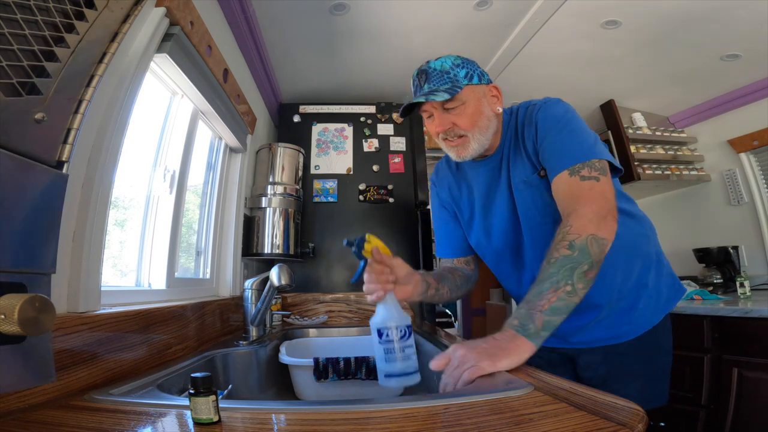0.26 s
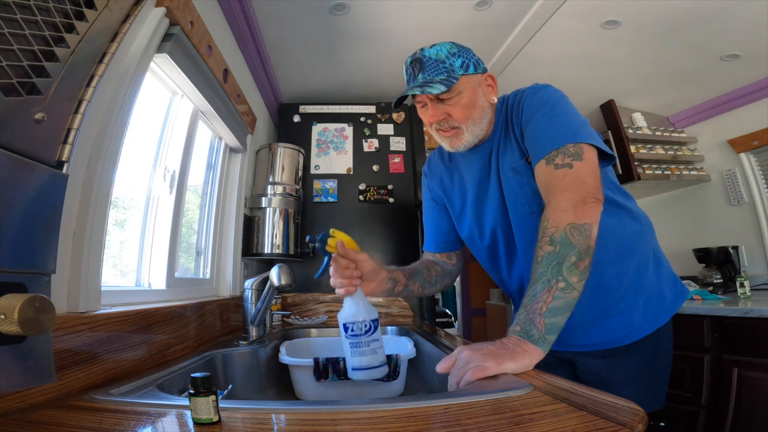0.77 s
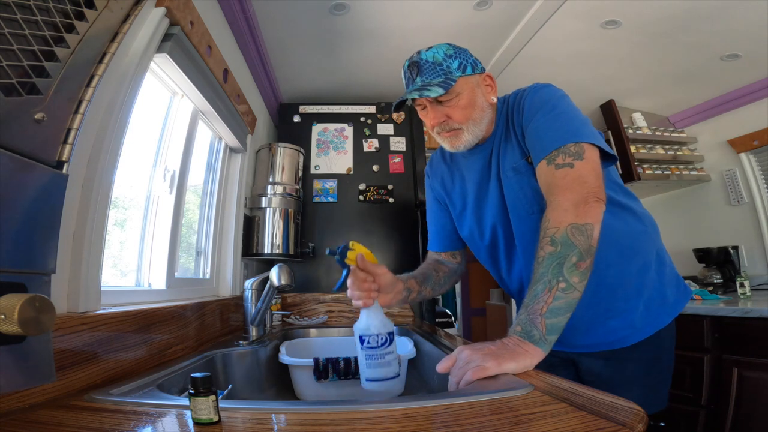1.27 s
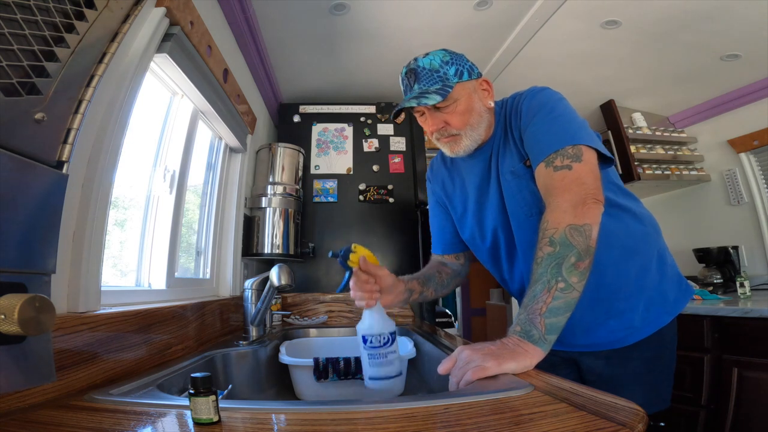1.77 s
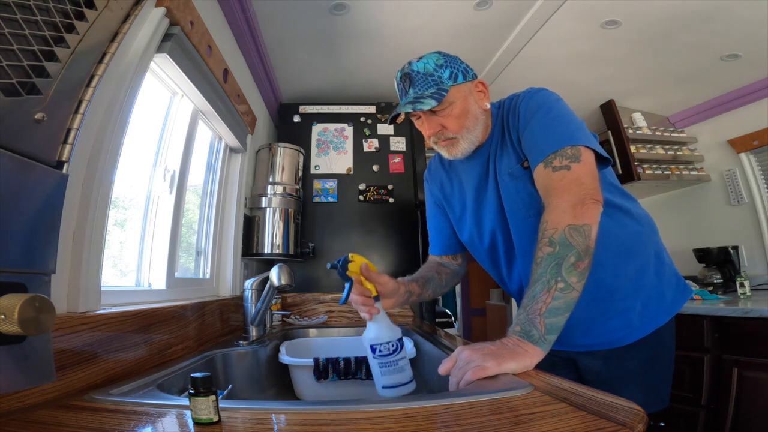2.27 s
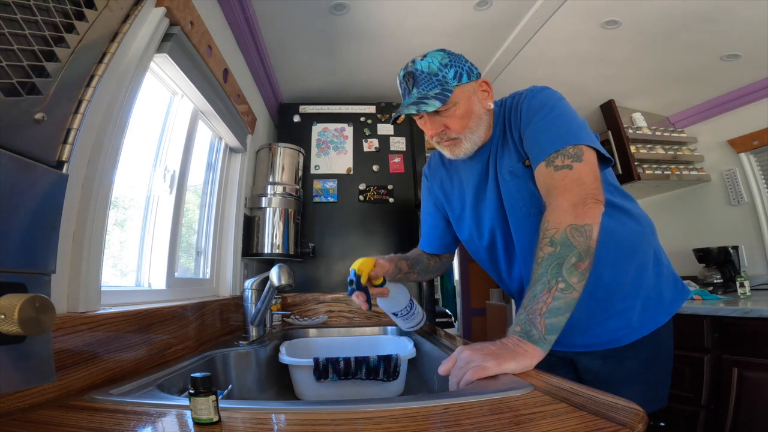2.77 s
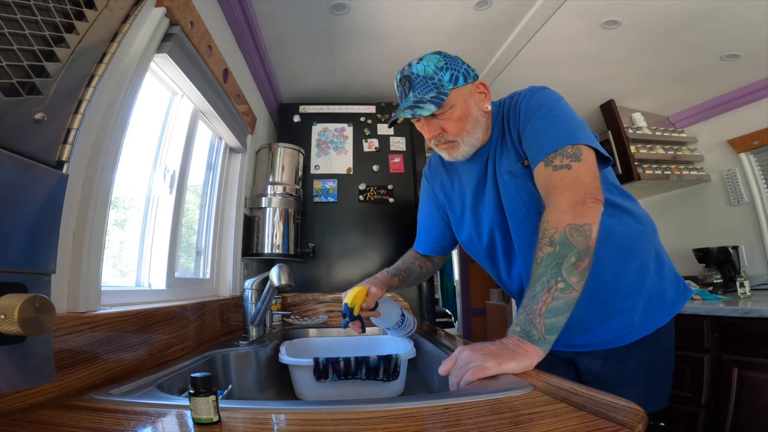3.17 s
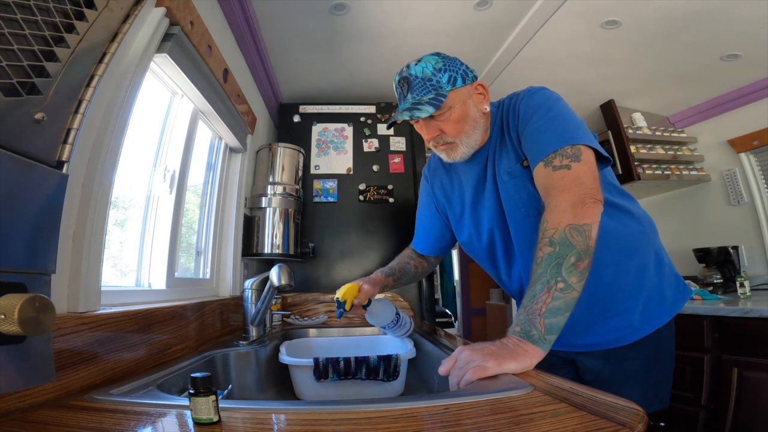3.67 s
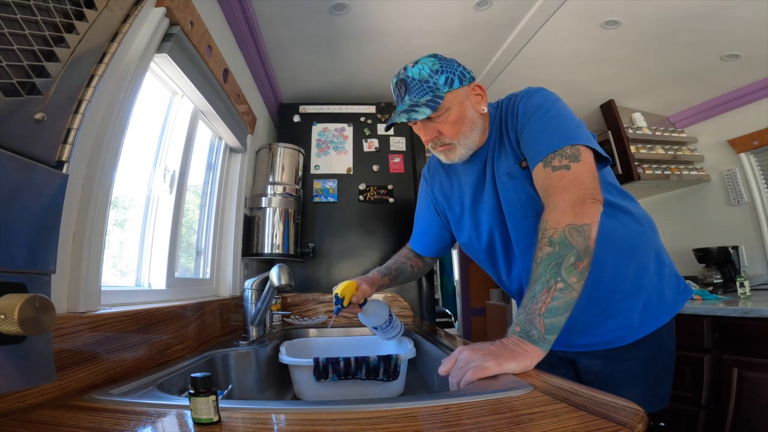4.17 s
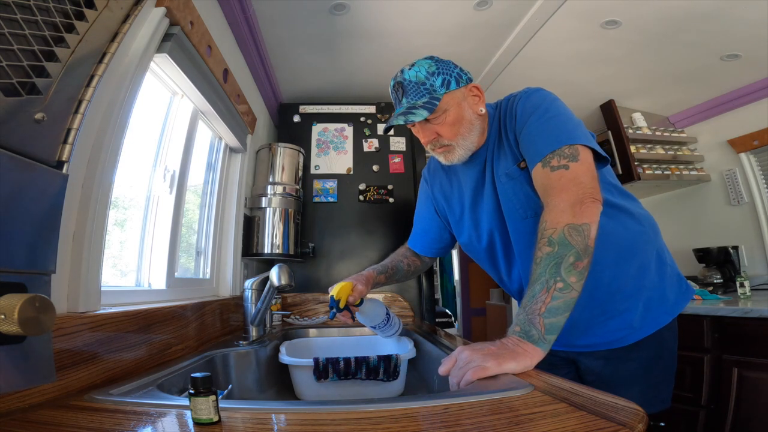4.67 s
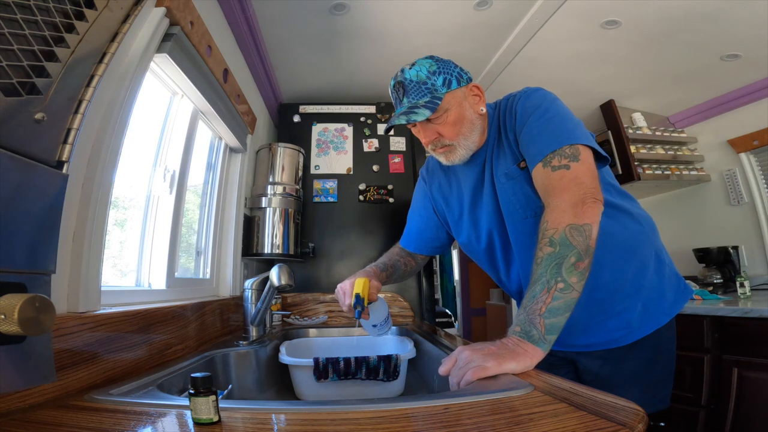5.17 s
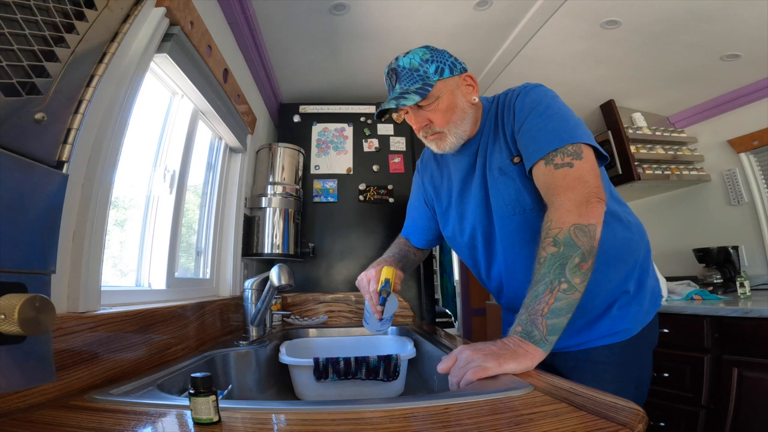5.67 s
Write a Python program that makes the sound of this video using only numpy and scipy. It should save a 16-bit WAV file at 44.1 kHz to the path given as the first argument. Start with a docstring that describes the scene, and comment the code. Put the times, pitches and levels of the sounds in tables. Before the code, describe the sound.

Liquid sloshes and froths in a shaken plastic bottle, then a creaky spray trigger snaps and hisses over a hollow steel basin in a small kitchen.

```python
"""A spray bottle scrapes off a counter and is shaken, its liquid slapping, gulping and frothing; then the trigger
clicks and groans, the nozzle spits and hisses, and a steel sink booms. Room air and a thin whine lie beneath.
Liquid and mist are coloured noise, with ringing bubbles in the liquid; the clicks and basin are decaying sines
with noise bursts; the groans are gliding harmonics. A small hard room answers with a short stereo tail."""
import sys
import numpy as np
from scipy import signal
from scipy.fft import rfft, irfft, next_fast_len
from scipy.io import wavfile
from scipy.ndimage import uniform_filter1d, map_coordinates

SR = 44100
rng = np.random.default_rng(int(sys.argv[2]) if len(sys.argv) > 2 else 0)


def transcribe(u):
    """Save the signal u as a 16-bit wav file named by the first command-line argument.

    u: samples, shape (n,) or (channels, n), limited to [-1, 1]; the rate is SR.
    q: integer samples, one column per channel.
    """
    v = np.clip(np.atleast_2d(u).T, -1, 1)
    q = np.round(v * 32767).astype(np.int16)
    wavfile.write(sys.argv[1], SR, q)


N = 261072
T = np.arange(N) / SR  # the time line in seconds

# low rumble of a moving mass against the counter: f/Hz, level/dB per Hz
RUMBLE_SPECTRUM = [(12, -25), (20, 4.5), (60, -7.5), (87, -3), (114, -14), (198, -11.5), (366, -46),
                   (400, -28.5), (520, -64), (880, -120)]


def amp(db):
    """Decibels to gain."""
    return np.exp(np.asarray(db) * (np.log(10) / 20))


def unit(x):
    """Scale to rms 1."""
    return x / np.sqrt(np.mean(x ** 2) + 1e-20)


def along(points, hz):
    """Interpolate (f/Hz, value) points on a log frequency axis."""
    f, value = np.transpose(points)
    return np.interp(np.log(hz + 1), np.log(f + 1), value)


def level(times, db):
    """Gain per sample from a dB curve, silent outside it."""
    return uniform_filter1d(amp(np.interp(T, times, db, left=-120, right=-120)), size=200)


def held(s, length, rise, fall):
    """An envelope from s: straight attack, hold, exponential release."""
    attack = np.clip((T - s) / rise, 0, 1)
    return attack * np.exp(-np.clip((T - s - length) / fall, 0, 20))


def add(track, s, db, rise, fall):
    """Add a swell that peaks at s, exponential on both sides."""
    near = slice(max(int((s - 9 * rise) * SR), 0), int((s + 9 * fall) * SR))
    t = T[near] - s
    track[near] += amp(db) * np.exp(-np.maximum(-t / rise, t / fall))


def wobble(rate):
    """A smooth random curve, rate knots a second."""
    return map_coordinates(rng.standard_normal(int(N * rate / SR) + 4), [T * rate])


def noise():
    """White noise."""
    return rng.standard_normal(N)


def filtered(x, response):
    """Shape the spectrum of x with a response of frequency."""
    m = next_fast_len(N + SR // 2)
    return irfft(rfft(x, m) * response(np.fft.rfftfreq(m, 1 / SR)), m)[..., :N]


def coloured(x, spectrum, lo_hz=10, hi_hz=20000):
    """One band of x under a spectrum, at rms 1."""
    def response(hz):
        band = 1 / np.sqrt((1 + (lo_hz / (hz + 1)) ** 8) * (1 + (hz / hi_hz) ** 8))
        return amp(along(spectrum, hz)) * band
    return unit(filtered(x, response))


def resonances(x, modes):
    """Ring x through (f/Hz, width/Hz, level/dB) modes of alternating sign, at rms 1."""
    def response(f):
        return sum((-1) ** k * amp(db) * 1j * f * width / (centre * centre - f * f + 1j * f * width)
                   for k, (centre, width, db) in enumerate(modes))
    return unit(filtered(x, response))


def droplets(rate, hiss):
    """Tiny impacts of random size, rate a second, over a smooth hiss."""
    impacts = unit(noise() * (rng.random(N) < rate / SR))
    return unit(impacts + hiss * noise())


def bubbles(rate, centre_hz, spread, cycles, glide):
    """A cloud of ringing bubbles, rate a second, each rising in pitch as it dies."""
    count = int(rate * N / SR)
    pitch, size = rng.standard_normal((count, 2)).T[:, :, None]
    hz = np.clip(centre_hz * np.exp(spread * pitch), 150, 9000)
    t = np.arange(int(3 * SR * cycles / centre_hz)) / SR
    age = hz * t / cycles
    tone = np.sin(2 * np.pi * hz * t * (1 + glide * age))
    ring = amp(6.8 * np.minimum(size, 2)) * tone * np.exp(-age) * (1 - t / t[-1])
    at = rng.integers(0, N, (count, 1)) + np.arange(len(t))
    return unit(np.bincount(at.ravel(), ring.ravel(), N)[:N])


def background(floor_db=-64.5, whine_hz=10230, whine_db=-84, side_db=-9):
    """Quiet room air as coloured stereo noise, with a thin electric whine of slightly wandering pitch."""
    # room air: f/Hz, level/dB per Hz
    air_spectrum = [(12, -31), (20, -8), (50, -18.5), (103, -27), (213, -11.5), (273, -27), (306, -23.5),
                    (685, -33), (2030, -30), (4800, -33), (9100, -49), (10500, -37), (11400, -52),
                    (15400, -56)]
    mid = coloured(noise(), air_spectrum)
    side = amp(side_db) * coloured(noise(), air_spectrum)
    whine = amp(whine_db) * np.sin(2 * np.pi * np.cumsum(whine_hz + 20 * wobble(60)) / SR)
    return amp(floor_db) * np.array([mid + side, mid - side]) + whine


def kitchen(x):
    """Hard walls and cupboards: a short decaying noise tail, more alike at the two ears in the bass."""
    # reverberation time: f/Hz, t60/s
    tail_t60 = [(100, 0.54), (800, 0.21), (2500, 0.21), (6000, 0.18), (14000, 0.2)]
    # stereo width of the reflections: f/Hz, side minus mid level/dB
    tail_width = [(60, -15), (250, -13), (1000, -3), (4000, -3), (9000, -3), (13000, 1)]
    hz, t, z = signal.stft(rng.standard_normal((2, SR // 2)), SR, nperseg=256)
    z = z * amp(-60 * t / along(tail_t60, hz)[:, None])
    gains = np.array([np.ones_like(hz), amp(along(tail_width, hz))])
    mid, side = signal.istft(z * gains[:, :, None], SR, nperseg=256)[1]
    tail = np.array([mid + side, mid - side]) / np.linalg.norm(mid)
    delayed = np.pad(x, (90, 0))  # samples of pre-delay
    return signal.fftconvolve(delayed[None], tail, axes=1)[:, :N]


def handling(rub_db=0, rumble_db=-3, swish_db=0, palm_db=-1):
    """Plastic rubs, swishes and rumbles on the counter as coloured noise; later it turns in the palm."""
    # sliding off the counter: t/s, relative rub level/dB, rumble level/dB, swish level/dB
    slide_curve = [(0.0, -54, -39, -62), (0.026, -53.5, -49, -69), (0.124, -45, -42, -57.5),
                   (0.216, -51, -34, -56.5), (0.293, -39.5, -35, -48.5), (0.342, -54, -45, -57),
                   (0.396, -50, -58, -46), (0.434, -58, -27, -75), (0.49, -85, -33, -68)]
    # turning in the hand at the end: t/s, relative level/dB
    turn_curve = [(5.501, -52), (5.59, -52), (5.62, -64), (5.7, -59.5), (5.72, -54), (5.77, -56.5),
                  (5.84, -71.5), (5.92, -57.5)]
    # plastic on the counter, then skin on plastic: f/Hz, level/dB per Hz
    rub_spectrum = [(150, -28), (250, -0.5), (371, -25), (522, -3.5), (609, -9.5), (1170, -4.5),
                    (5100, -9.5), (11600, -19.5), (15000, -32)]
    palm_spectrum = [(120, -20), (230, -1), (400, -11), (800, -13), (1300, 0.5), (2000, -4), (3000, -3.5),
                     (6000, -7.5), (12000, -24), (15000, -29)]
    s, *columns = np.transpose(slide_curve)
    rub, rumble, swish = (level(s, db) for db in columns)
    turn = level(*np.transpose(turn_curve))
    return (amp(rub_db) * rub * coloured(droplets(2500, hiss=0.81), rub_spectrum, hi_hz=4800)
            + amp(swish_db) * swish * coloured(noise(), rub_spectrum, lo_hz=4630)
            + amp(rumble_db) * rumble * coloured(noise(), RUMBLE_SPECTRUM)
            + amp(palm_db) * turn * coloured(droplets(1500, hiss=0.94), palm_spectrum))


def sink(boom_db=-4, thud_fall=0.022, splash_fall=0.011, shudder_db=-14, shudder_fall=0.11):
    """Each blow rings the thin steel basin's modes, with a dull thud, a short splash and a cabinet shudder."""
    # blows: t/s, relative ring level/dB, relative thud level/dB, share of the full ring time
    blows = [(0.0, -34.5, -70, 0.53), (0.387, -37.5, -38.5, 0.79), (0.423, -38.5, -58, 0.85),
             (3.251, -22.5, -39, 0.6), (3.298, -18.5, -35, 0.47), (3.329, -20, -41, 0.66),
             (3.37, -27, -50, 0.84), (3.415, -35, -58, 0.45), (3.472, -51, -47, 0.64),
             (3.657, -17.5, -26.5, 1), (3.882, -18, -30.5, 1), (4.785, -44, -37.5, .5),
             (5.55, -69, -77, .6), (5.676, -56, -63, .6)]
    # modes of the steel basin: f/Hz, level/dB, full t60/s
    basin_modes = [(37.7, -1, 0.46), (68.6, -20, 0.4), (87.4, 5.5, 0.31), (141, -15.5, .42),
                   (209.5, -10, 0.25), (242, -19.5, 0.52), (292, -12, 0.19), (534, -14.5, 0.14),
                   (720, -21, 0.11), (900, -16, 0.1)]
    # the cabinet under the sink: f/Hz, level/dB per Hz
    cabinet_spectrum = [(20, -15), (40, 4), (60, 5), (85, 3.5), (115, -12.5), (240, -14.5), (330, -40),
                        (600, -84)]
    thud_spectrum = [(25, -17), (70, 15.5), (150, 10.5), (210, 13.5), (290, 8.5), (400, -27), (900, -63)]
    splash_spectrum = [(200, -29), (450, 0.0), (720, 4.5), (1100, 1.0), (3000, -4), (8000, -19), (14000, -39)]
    detune, build_cycles = 0.023, 0.76  # modes shift from blow to blow and take part of a cycle to build up
    hard_blow_db, splash_db = -15.5, -3  # at this ring level the splash sits this far from its thud; softer, lower
    out, thud, splash, shudder = np.zeros((4, N))
    t = np.arange(SR // 2) / SR
    for s, db, thud_db, share in blows:
        ring = 0
        for hz, mode_db, t60 in basin_modes:
            louder, shift = rng.standard_normal(2)
            decay = amp(mode_db + louder - 60 * t / (share * t60))
            build = 1 - np.exp(-t * hz / build_cycles)
            ring = ring + decay * build * np.sin(2 * np.pi * hz * (1 + detune * shift) * t)
        after = out[max(round(s * SR), 0):][:len(t)]
        after += amp(db + boom_db) * ring[:len(after)]
        shudder += amp(db + shudder_db) * held(s, 0.013, 0.035, share * shudder_fall)
        add(thud, s + 0.0051, thud_db, .002, thud_fall)
        add(splash, s + 0.0016, thud_db + splash_db + db - hard_blow_db, .003, splash_fall)
    return (out + shudder * coloured(noise(), cabinet_spectrum)
            + thud * coloured(noise(), thud_spectrum) + splash * coloured(noise(), splash_spectrum))


def piston(jitter=0.014, unsteady=0.015, count=6):
    """The seal sticks and slips: harmonics of a bending, unsteady pitch sweep through fixed resonances."""
    # groans: t/s, length/s, level/dB, then f/Hz at start, middle and end before the waver
    groans = [(3.31, 0.13, -37, 347.5, 284, 348), (4.43, 0.17, -41, 270.6, 312, 241),
              (4.775, 0.17, -39.5, 240.2, 308.8, 275), (5.01, 0.06, -52, 285, 261, 215),
              (5.24, .1, -38, 261.5, 287.4, 212), (5.455, 0.062, -53, 212, 243.7, 208)]
    # colour of the seal: f/Hz, level/dB
    seal_colour = [(240, -1.5), (310, 1.5), (440, -22), (525, 5.5), (610, -11.5), (900, -13.5), (1200, -11),
                   (1600, -20), (2400, -26)]
    out = np.zeros(N)
    waver = 1 + jitter * wobble(150) + unsteady * wobble(22)  # rough seal, unsteady finger
    for s, length, db, *bend in groans:
        moving = (T > s) & (T < s + length)
        travel = (T[moving] - s) / length
        hz = np.polyval(np.polyfit([0, .5, 1], bend, 2), travel) * waver[moving]
        phase = 2 * np.pi * np.cumsum(hz) / SR
        voice = sum(amp(along(seal_colour, k * hz)) * np.sin(k * phase) for k in range(1, count + 1))
        out[moving] += amp(db) * np.sin(np.pi * travel) * voice
    return out


def creak(count=7, start_s=3.177, gap_s=.0172):
    """The trigger slips under the tightening finger in an even run of ever louder clicks."""
    first_db, grows_db, knock_db, tick_db = -29.5, 1.42, -7, -7.5  # relative levels
    return [(start_s + k * gap_s, first_db + k * grows_db, knock_db, tick_db) for k in range(count)]


def clicks(knock_db=-10, crack_db=-11, tick_db=-9, ring_db=-8, knock_fall=0.019, crack_fall=0.0097,
           tick_fall=0.0039):
    """Sharp clicks: a short pitched ping and a noise crack whose low band lasts longest."""
    # grip and trigger snaps, and a few hard liquid slaps during the shaking:
    # t/s, relative level/dB, then knock and tick level/dB relative to it
    click_events = [(0.4975, -39, -14, 7.5), (0.5244, -22, -20, -30), (0.567, -28, -23, -23),
                    (0.677, -26, -2, -24), (0.7013, -25, -1, -5), (0.9745, -21.5, -5, -15),
                    (2.07, -23, 0, -14), (2.703, -40, 4.5, -7), (2.725, -43, -2, -7.5),
                    (3.2986, -4.5, -12, -14), (3.501, -19, -3, -16), (3.5822, -20, -4, -6),
                    (3.8267, -22, -1, -3.5), (3.9953, -16, -8, -11.5), (4.0729, -22, -1, -1),
                    (4.2673, -32, 4.5, 15), (4.329, -18.5, -4, -15), (4.6145, -20.5, -1.5, -5),
                    (4.782, -16, -2.5, -12), (4.9439, -25.5, 5, -20), (5.1567, -28.5, -4, -12),
                    (5.1822, -25.5, -6, -10), (5.328, -21.5, 0.5, -19), (5.3792, -20.5, 0, -3),
                    (5.759, -47, 4.5, -12)]
    # pitched ring of a click: f/Hz before the spread, level/dB, t60/s
    ping_modes = [(427, -19, .07), (890, -14, .07), (2750, -3.5, 0.031), (3234, -3, 0.034),
                  (3876, -3, 0.017), (5510, -13, 0.015)]
    # noise crack of a click: f/Hz, level/dB per Hz
    crack_spectrum = [(120, -27), (200, -17.5), (664, -8), (905, -6.5), (1840, -2.5), (2690, 2.5),
                      (3230, 3.5), (4650, 3.5), (5380, -1.5), (6570, -7.5), (12000, -15.5), (13600, -22),
                      (15400, -65)]
    spread = 0.033  # the modes shift from click to click, as a share of frequency
    knock, crack, tick, ping = np.zeros((4, N))
    t = np.arange(SR // 12) / SR
    for s, db, low_db, high_db in click_events + creak():
        modes = 0
        for hz, mode_db, t60 in ping_modes:
            shifted_hz = hz * (1 + spread * rng.standard_normal())
            modes = modes + amp(mode_db - 60 * t / t60) * np.sin(2 * np.pi * shifted_hz * t)
        add(knock, s + 0.0025, db + low_db + knock_db, .0004, knock_fall)
        add(crack, s + 0.00154, db + crack_db, .0003, crack_fall)
        add(tick, s + 0.00043, db + high_db + tick_db, .0002, tick_fall)
        ping[round(s * SR):][:len(t)] += amp(db + ring_db) * modes * (1 - np.exp(-t / 0.00032))
    return (knock * coloured(noise(), crack_spectrum, lo_hz=250, hi_hz=1950)
            + crack * coloured(noise(), crack_spectrum, lo_hz=1930, hi_hz=7300)
            + tick * coloured(noise(), crack_spectrum, lo_hz=6640) + ping)


def spray(mist_db=-1, flow_db=0, cutoff=0.0086, sputter_db=2.95):
    """The valve opens and closes: fine mist hisses high, coarser drops lower; liquid spatters with each stroke."""
    # bursts of mist: t/s, opening/s, length/s, relative level/dB, coarse drops level/dB relative to it
    mist_bursts = [(3.392, 0.0025, 0.08, -34, 2), (3.718, 0.0085, 0.038, -34.5, 4.5),
                   (3.966, .01, .025, -47.5, 2), (4.143, 0.021, 0.029, -42.5, 7),
                   (4.222, 0.034, 0.05, -34, -6.5), (4.261, 0.009, 0.072, -34.5, -3.5),
                   (4.377, .008, 0.054, -44.5, 3.5), (4.478, .006, 0.094, -38, 2.5),
                   (4.669, .008, 0.065, -42, 0.5), (4.807, .008, 0.14, -48.5, 6),
                   (4.872, .016, 0.071, -42.5, 5), (4.97, .01, .115, -57, -3),
                   (5.251, 0.0032, 0.074, -42.5, 3), (5.336, .01, 0.075, -52, -9),
                   (5.463, 0.021, 0.06, -45, 2.5)]
    # piston strokes, pressed or springing back: t/s, length/s, relative flow level/dB
    strokes = [(3.293, 0.098, -39.5), (3.393, .11, -39.5), (3.69, 0.23, -49), (3.886, 0.38, -51),
               (4.26, 0.11, -43.5), (4.418, .16, -41), (4.565, 0.097, -41.5), (4.751, 0.22, -37),
               (4.996, 0.082, -53.5), (5.179, .23, -41.5), (5.427, 0.037, -54.5)]
    # mist at the nozzle, then spattering liquid: f/Hz, level/dB per Hz
    nozzle_spectrum = [(530, -5), (900, -9), (1210, -5), (1560, 6), (2020, 1), (2560, 9.5), (3660, 8.5),
                       (3930, 8), (5360, 3), (8220, -7), (11100, -6), (14200, -15.5), (15400, -34)]
    spatter_spectrum = [(76, -50), (140, -11), (230, -3.5), (289, -10), (375, -6.5), (527, -4), (631, -3.5),
                        (1430, -3.5), (2010, -8.5), (2820, -5), (7670, -14.5), (9000, -30), (11900, -19.5),
                        (15400, -58)]
    # resonances of the nozzle, then of dip tube and barrel: f/Hz, width/Hz, level/dB
    jet_modes = [(2910, 160, -0.5), (4280, 200, 2), (5870, 28, -20), (11120, 55, 15), (12200, 200, 3)]
    tube_modes = [(1126, 130, -6), (2240, 230, -1.5), (3185, 125, 2), (3540, 100, -3), (4550, 240, -2)]
    fine, coarse = np.zeros((2, N))
    for s, opening, length, db, coarse_db in mist_bursts:
        valve = amp(db + mist_db) * held(s, length, opening, cutoff)
        fine += valve
        coarse += amp(coarse_db) * valve
    mist = fine * coloured(droplets(4400, hiss=0.8), nozzle_spectrum, lo_hz=6670)
    mist += coarse * coloured(droplets(6000, hiss=1.44), nozzle_spectrum, hi_hz=6540)
    mist += amp(-8.0) * fine * resonances(noise(), jet_modes)
    flow = sum(amp(db) * held(s, length, rise=0.017, fall=0.023) for s, length, db in strokes)
    flow = flow * amp(flow_db + 2.4 * wobble(90))
    spatter = amp(-1) * coloured(droplets(1200, hiss=0.81), spatter_spectrum)
    spatter += amp(-4.5) * resonances(droplets(1200, hiss=0.51), tube_modes)
    return mist * amp(sputter_db * wobble(120)) + flow * spatter


def gurgles(gurgle_db=-5, life=0.0076, glide=-3):
    """Brief decaying sines that sink in pitch, as air pockets do when they stretch."""
    # ringing air pockets, and one faint tick at the end: t/s, relative level/dB, f/Hz at the start
    pockets = [(0.606, -24.5, 1215), (0.724, -15, 1220), (0.841, -33, 1210), (1.095, -22, 205),
               (1.262, -21, 1200), (1.5, -22, 264), (1.535, -22, 867), (1.76, -19, 1250), (1.826, -19, 422),
               (1.85, -17.5, 270), (1.851, -13.5, 1065), (2.089, -16, 938), (2.241, -13, 1024),
               (1.975, -19.5, 1027), (2.319, -17, 970), (2.609, -28.5, 1067), (5.762, -38, 1280)]
    out, t = np.zeros(N), np.arange(SR // 12) / SR
    envelope = np.exp(-t / life) - np.exp(-t / 0.0016)
    for s, db, hz in pockets:
        tone = np.sin(2 * np.pi * hz * t * (1 + glide * t))
        out[round(s * SR):][:len(t)] += amp(db + gurgle_db) * tone * envelope
    return out


def slosh(body_db=-11, gulp_db=-11, froth_db=-12, bubble_share=0.94, ring_share=0.28):
    """Each slap traps air (gulp), rings the bottle (body) and sprays (froth); between slaps the liquid churns."""
    # liquid hits an end of the bottle: first contact t/s, swell/s, relative level/dB, gulp level/dB, decay/s
    slaps = [(0.578, .034, -34, -23, 0.014), (0.701, 0.025, -20, -12, 0.026),
             (0.803, 0.028, -19, -3.5, 0.03), (0.975, 0.024, -24, -14, 0.015),
             (1.012, .007, -22, -7, 0.019), (1.055, 0.042, -22.5, -6, 0.031),
             (1.215, 0.025, -24, -11.5, 0.06), (1.33, 0.02, -18, -4, 0.022),
             (1.472, 0.0094, -24, -23, 0.015), (1.496, .005, -22, -3.5, 0.023),
             (1.581, 0.017, -17, -1.5, 0.015), (1.741, 0.013, -21.5, -9, 0.053),
             (1.812, 0.025, -26.5, 0, 0.026), (1.848, 0.0044, -19, -9, 0.032),
             (1.955, 0.019, -22.5, -12.5, 0.034), (2.067, 0.025, -17.5, -5, 0.022),
             (2.209, 0.024, -22, -21, 0.01), (2.235, 0.0076, -20.5, -5, 0.019),
             (2.312, 0.01, -22.5, -1, 0.014), (2.332, 0.017, -21, -5, 0.0079),
             (2.529, 0.049, -41, -3.5, .074)]
    # the moving liquid: f/Hz, level/dB per Hz
    liquid_spectrum = [(59, -51), (100, -18), (201, 3.5), (281, -0.5), (354, -25), (507, 4), (600, -4.5),
                       (915, 0), (1870, -7), (3180, -6), (7380, -17.5), (8740, -29.5), (10800, -25),
                       (13300, -34.5), (15400, -69)]
    # air and wall resonances of the bottle: f/Hz, width/Hz, level/dB
    bottle_modes = [(272, 270, -1.5), (554, 14, -7), (1310, 270, 1.5)]
    contact_db, contact_s = -8.5, 0.0011  # a slap starts abruptly this far below its peak
    lull_db, lull_s = -4.5, 0.058  # in flight, just before a contact, the churn falls away
    start_s, length_s, churn_db = .5, 1.898, -38  # the liquid churns for as long as it is shaken

    slap, gulp, lull = np.zeros((3, N))
    for s, swell, db, low_db, fall in slaps:
        swell_db = contact_db * np.clip(1 - (T - s) / swell, 0, 1)
        wave = amp(db + swell_db) * held(s, swell, contact_s, fall)
        slap += wave
        gulp += amp(low_db + gulp_db) * wave
        lull = np.maximum(lull, (T < s) * np.exp(-np.abs(T - s) / lull_s))
    clumps = 2.2 * wobble(260)  # the splashes come in clumps (dB)
    body = amp(body_db + clumps) * slap
    froth = amp(froth_db + clumps) * slap
    unrest = amp(churn_db + lull_db * lull + 0.67 * wobble(60) + clumps)
    churn = unrest * held(start_s, length_s, rise=0.19, fall=0.13)
    foam = unrest * held(start_s, length_s, rise=0.098, fall=0.078)  # the fine foam settles first

    water = droplets(2800, hiss=1.0) + ring_share * resonances(noise(), bottle_modes)
    low_bubbles = bubbles(160, centre_hz=365.4, spread=0.394, cycles=5.7, glide=0.028)
    mid_bubbles = bubbles(320, centre_hz=1136, spread=0.27, cycles=12.7, glide=0.037)
    high_bubbles = bubbles(550, centre_hz=2990, spread=0.28, cycles=21, glide=0.012)
    low = unit(coloured(water, liquid_spectrum, lo_hz=142, hi_hz=665) + 0.84 * low_bubbles)
    mid = unit(coloured(water, liquid_spectrum, lo_hz=725, hi_hz=2150) + bubble_share * mid_bubbles)
    high = unit(coloured(water, liquid_spectrum, lo_hz=2200) + 0.78 * high_bubbles)
    shove = amp(-16.5) * gulp * coloured(noise(), RUMBLE_SPECTRUM)  # the moving mass jolts arm and counter
    return (shove + low * np.hypot(gulp, amp(-40.0) * churn)
            + mid * np.hypot(body, amp(-6) * churn) + high * np.hypot(froth, foam))


def scene():
    """All sources lie straight ahead; the basin's deep boom stays dry, only its higher ringing gets the room tail."""
    liquid = slosh() + gurgles() + handling()
    pump = clicks() + spray() + piston()
    basin = sink()
    higher_ringing = filtered(basin, lambda hz: hz ** 4 / (hz ** 4 + 260 ** 4))
    return (amp(-2.5) * liquid + amp(-10.0) * kitchen(liquid)
            + amp(-1.5) * pump + amp(-8.5) * kitchen(pump)
            + basin + amp(-6.0) * kitchen(higher_ringing) + background())


def record(dry):
    """The left channel is a little brighter; nothing passes the band limit."""
    # channel balance: f/Hz, left minus right level/dB
    balance = [(100, 0.5), (250, -2), (600, -0.1), (2400, 0.5), (4500, 0), (8000, 3), (14000, 2.5)]
    top_hz = 15450
    halves = np.array([[.5], [-.5]])  # each channel takes half the difference
    return filtered(dry, lambda hz: amp(halves * along(balance, hz)) * (hz < top_hz))


dry = scene()
out = record(dry)
transcribe(out)
```